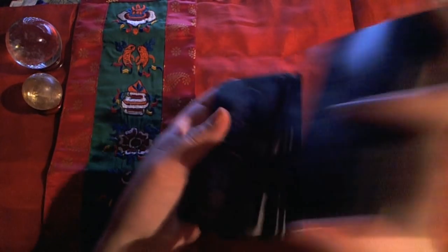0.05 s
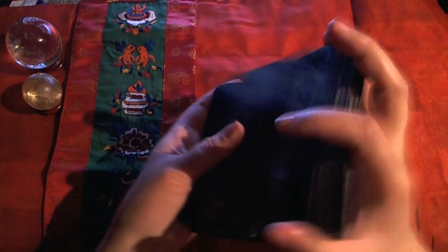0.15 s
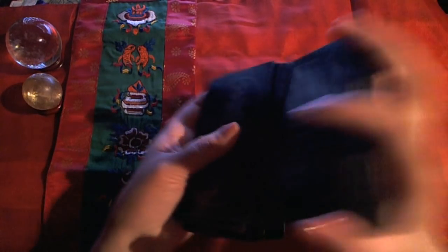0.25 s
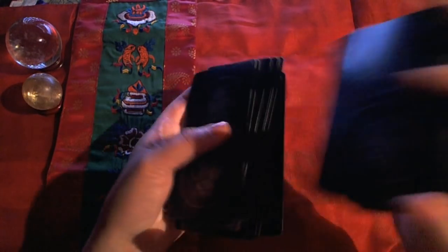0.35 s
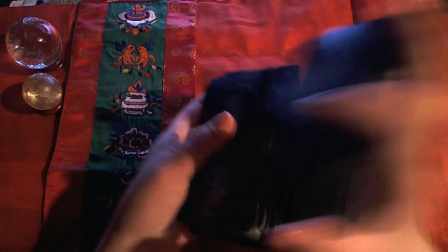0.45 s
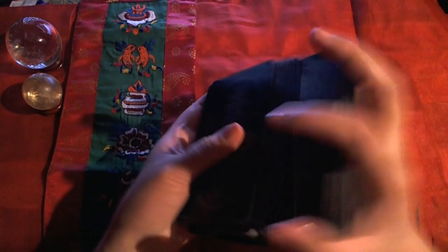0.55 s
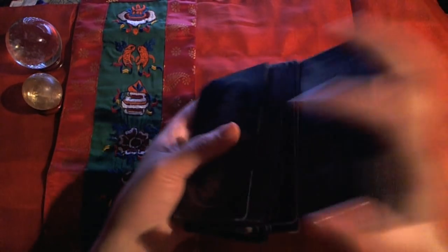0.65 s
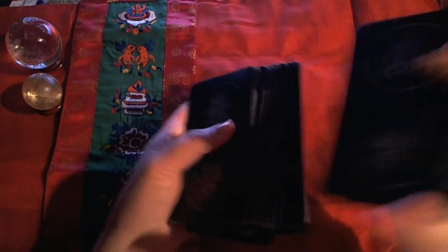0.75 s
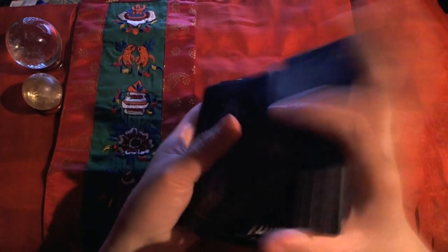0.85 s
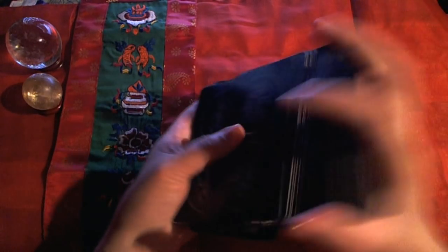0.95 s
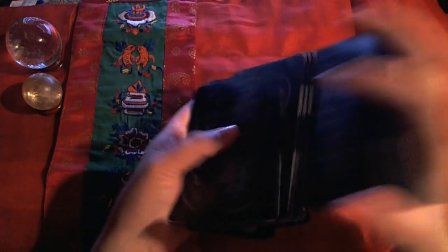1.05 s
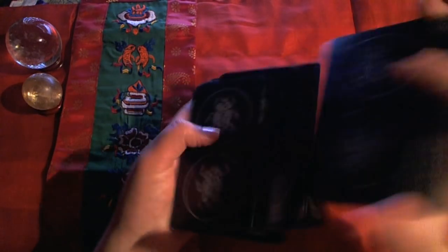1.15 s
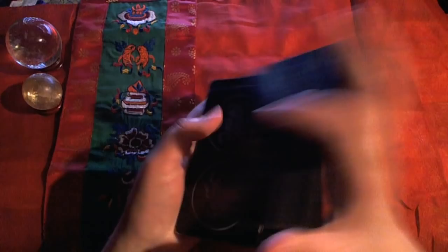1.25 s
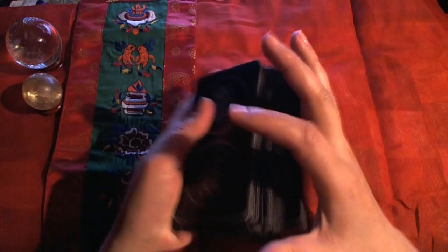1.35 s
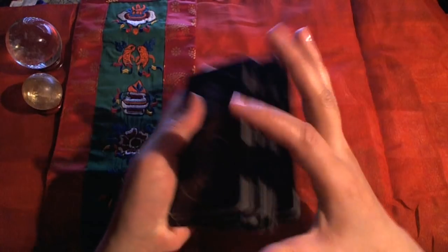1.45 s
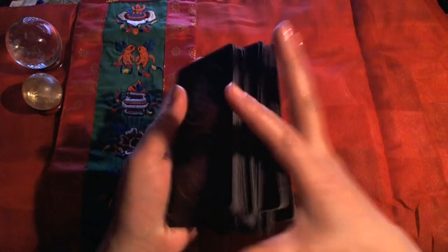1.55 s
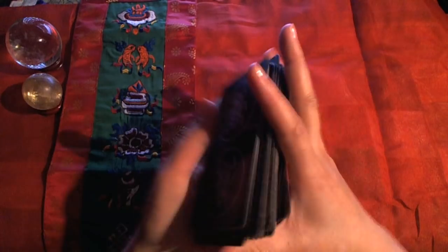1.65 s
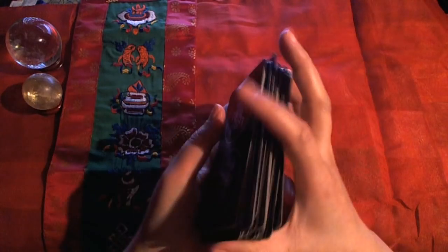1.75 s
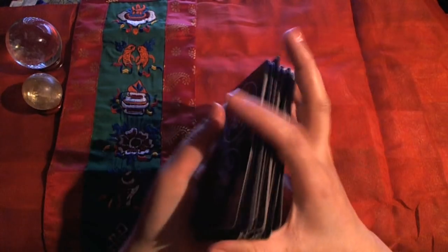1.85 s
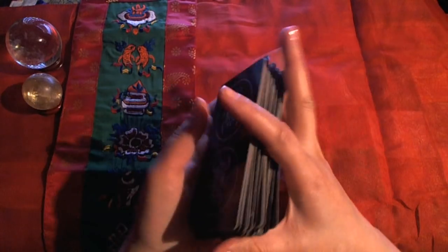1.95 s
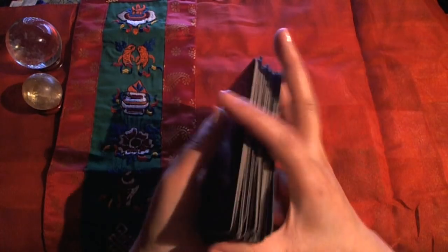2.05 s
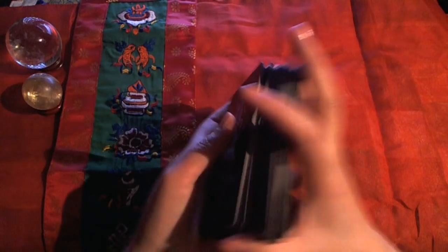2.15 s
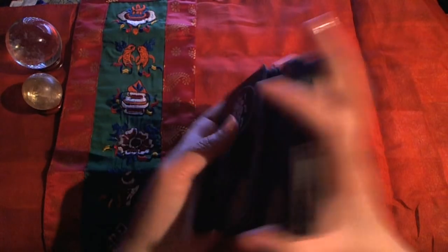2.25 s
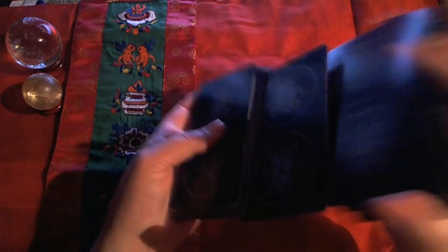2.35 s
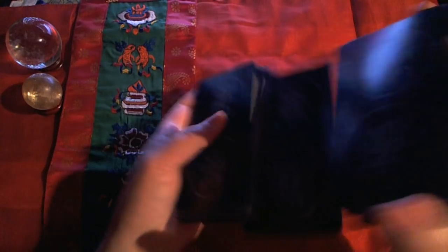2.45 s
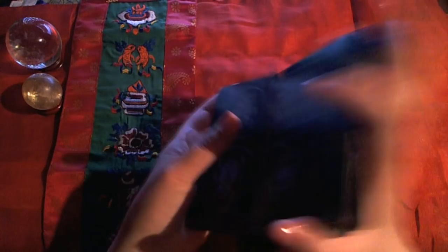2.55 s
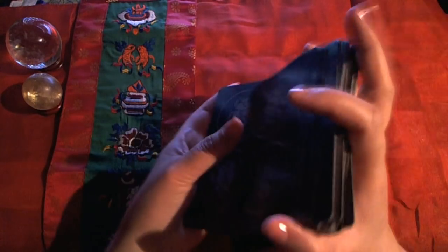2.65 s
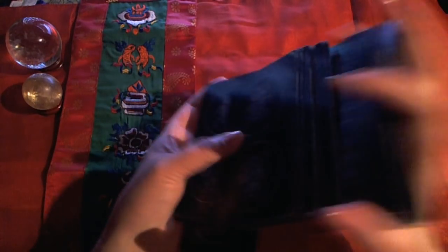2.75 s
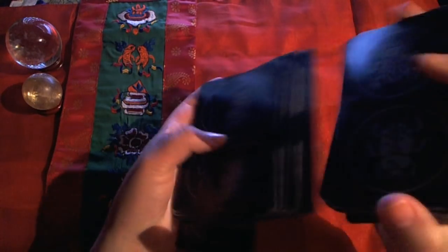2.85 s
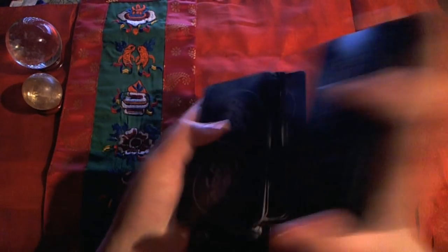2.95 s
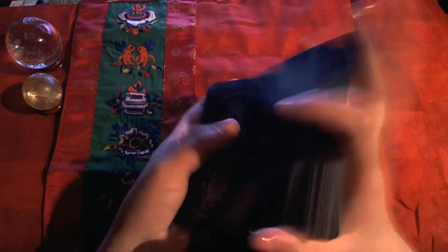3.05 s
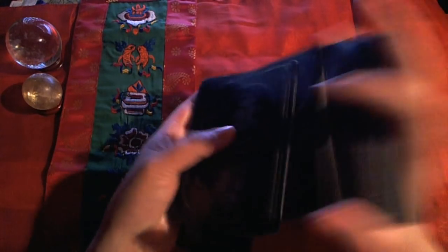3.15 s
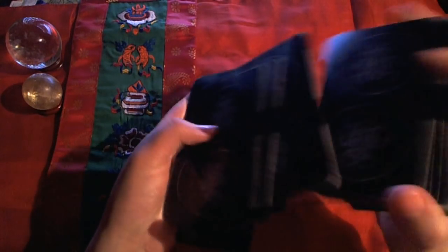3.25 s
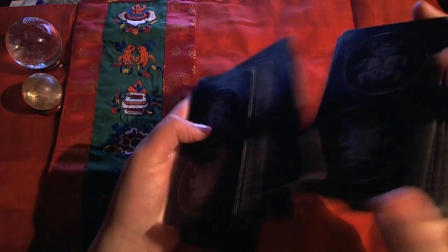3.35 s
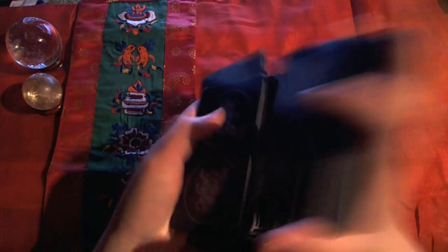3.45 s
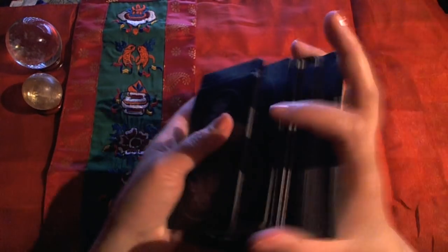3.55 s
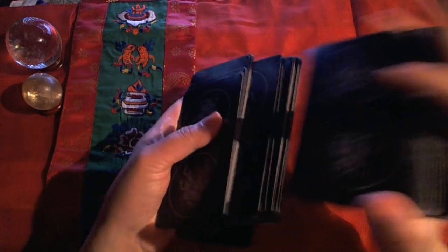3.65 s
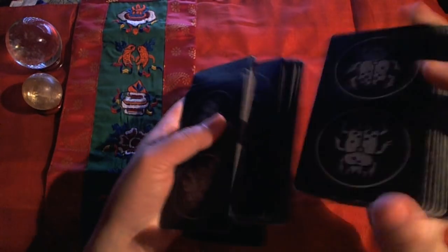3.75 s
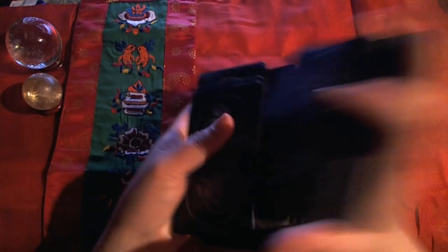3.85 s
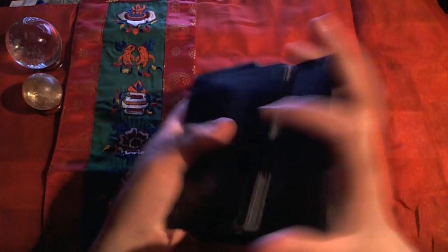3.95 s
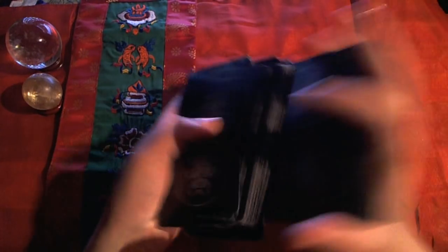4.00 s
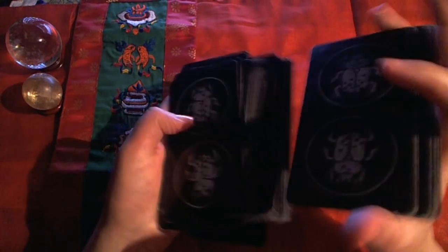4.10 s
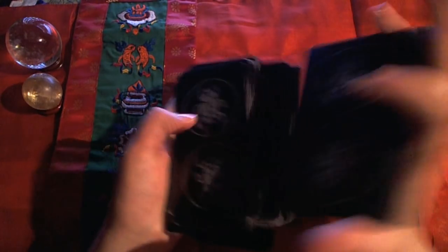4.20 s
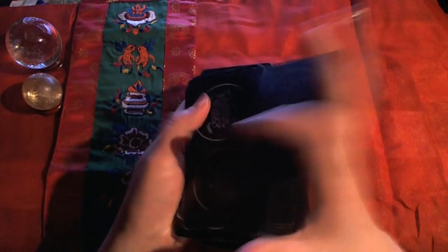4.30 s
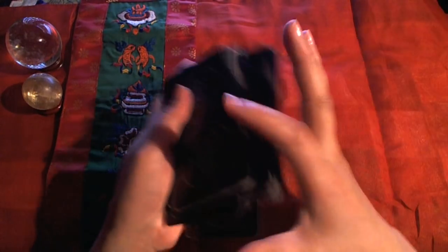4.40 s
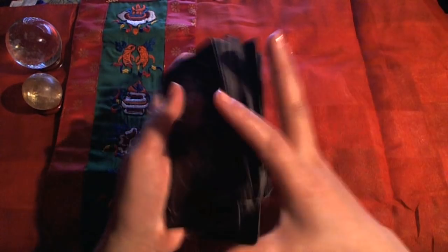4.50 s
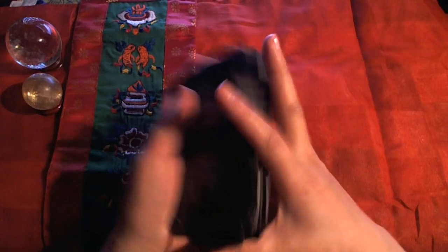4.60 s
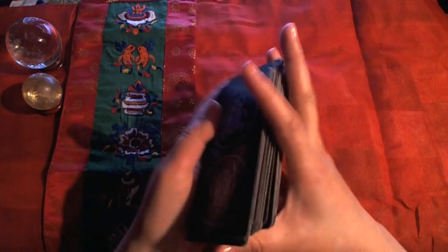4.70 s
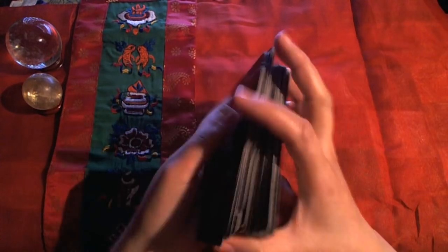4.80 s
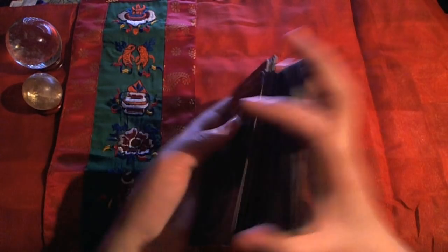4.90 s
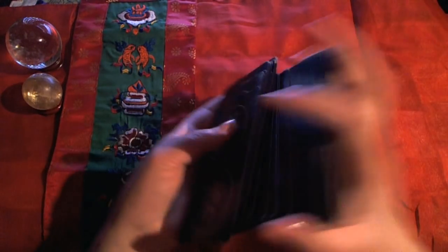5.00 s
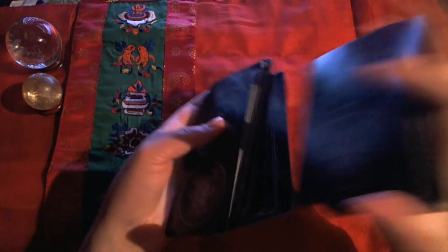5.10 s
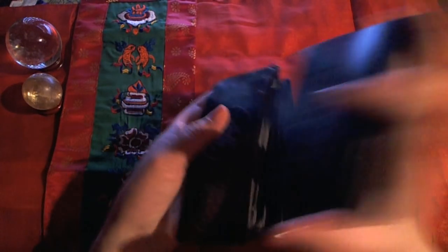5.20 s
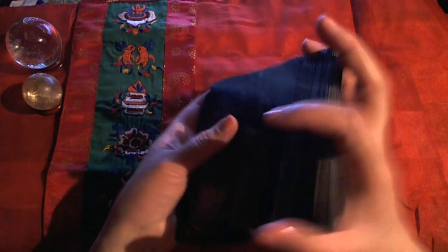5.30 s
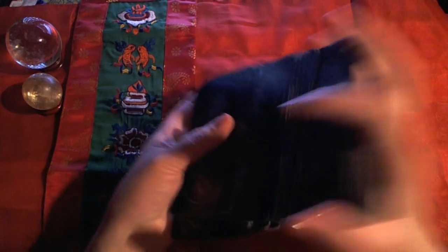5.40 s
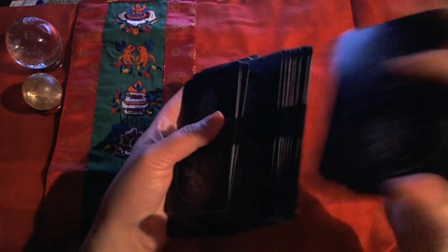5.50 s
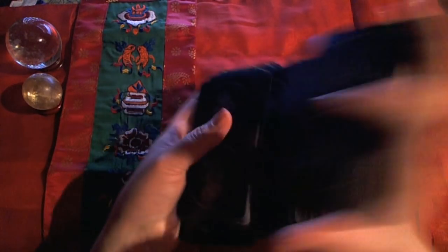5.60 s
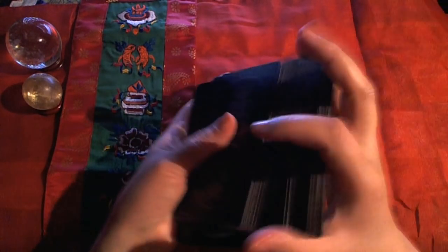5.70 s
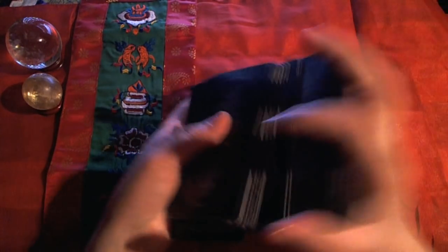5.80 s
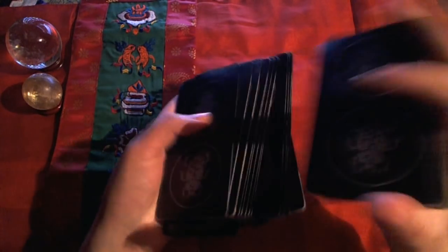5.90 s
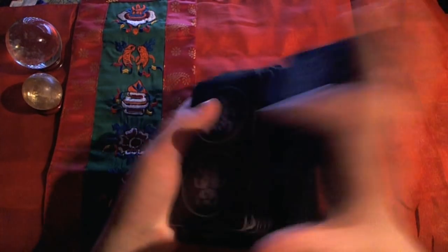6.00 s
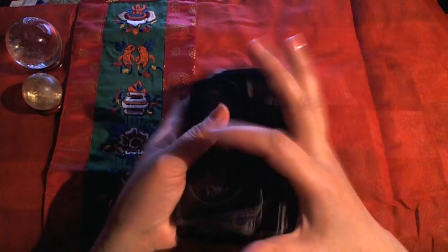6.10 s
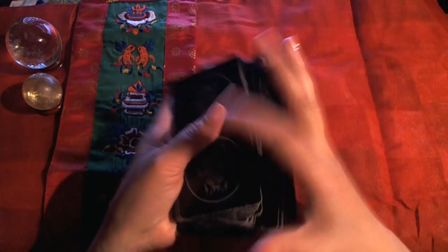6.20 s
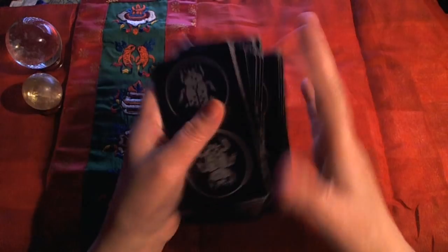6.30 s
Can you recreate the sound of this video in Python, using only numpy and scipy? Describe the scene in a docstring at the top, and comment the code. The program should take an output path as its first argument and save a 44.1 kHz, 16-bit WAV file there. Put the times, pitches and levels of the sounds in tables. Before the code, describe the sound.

A deck of large cards is shuffled overhand very close up, packets slapping and sliding together, with two short pauses to square it.

```python
"""Overhand shuffle of large cards

A deck of large cards is shuffled close to two microphone ports in a small, quiet room with a faint hum.
Packets touch, slap down with a thud and slide in: sprays of contacts and gritty friction noise drive the
card stock, and decaying sines give the thuds. Dragged packets scrape and catch, loose cards tap.
Twice the throws pause to square the deck, with rubbing faces and finger knocks; the room answers briefly."""
import sys
import numpy as np
from scipy import signal
from scipy.fft import rfft, irfft
from scipy.io import wavfile
from scipy.ndimage import map_coordinates

SR = 44100
rng = np.random.default_rng(int(sys.argv[2]) if len(sys.argv) > 2 else 0)


def to_wav(sig):
    """Store sig (one row per channel, or 1-D mono) as 16-bit WAV at the path in sys.argv[1].

    Samples outside -1..1 are clipped; the rate is SR.
    """
    pcm = np.clip(np.atleast_2d(sig), -1, 1) * 32767
    pcm = np.round(pcm).astype(np.int16)
    wavfile.write(sys.argv[1], SR, pcm.T)  # frames by channels


N = 280476

POCKET_PER_LOW_EDGE = 2.0  # in light contacts the air pocket rings an octave above the low edge
KNOCK_CYCLES = 1.7  # a finger knock swells for this many cycles


def amp(db):
    """Level law: decibels to amplitude gain."""
    return 10 ** (np.asarray(db) / 20)


def evened(x):
    """Power normalisation: scales to an rms of 1."""
    return x / np.sqrt(np.mean(x ** 2) + 1e-20)


def read(points, hz):
    """Spectral interpolation: reads a table on a log-frequency axis."""
    table_hz, value = np.transpose(points)
    return np.interp(np.log(hz + 1), np.log(table_hz + 1), value)


def add(mix, s, sound):
    """Superposition: mixes a sound in at time s."""
    part = mix[max(round(s * SR), 0):][:len(sound)]
    part += sound[:len(part)]


def wander(size, per_s):
    """Slow random modulation: smooth chance that changes about per_s times a second."""
    at = np.arange(size) * per_s / SR
    return np.interp(at, np.arange(size), rng.standard_normal(size))


def shaped(x, points):
    """Linear filtering: multiplies the spectrum by a table of frequency_hz, gain_db."""
    return irfft(rfft(x) * amp(read(points, np.fft.rfftfreq(N, 1 / SR))), N)


def background(spread=.2, waver=.3, waver_per_s=25, hum_db=-3.0, air_db=-65.5):
    """Stationary noise and tones: partly correlated room air, and hum partials with wavering phase."""
    # still air: frequency_hz, relative_density_db
    air_colour = [(18, -79), (30, -35), (145, -12), (189, -1.5), (319, -7), (486, -7), (760, -13.5),
                  (844, -13.5), (2010, -18.5), (4420, -28.5), (5040, -23.5), (8740, -37), (10200, -30),
                  (14800, -46), (16000, -68.5)]
    # hum partials: pitch_hz, rms_db (before the common hum_db)
    hum_partials = [(209.9, -70.5), (484.5, -69.5), (1104, -77.5)]
    mid, side = evened(shaped(rng.standard_normal((2, N)), air_colour))
    air = np.array([mid + spread * side, mid - spread * side])
    t = np.arange(N) / SR
    hum = np.zeros(N)
    for hz, db in hum_partials:
        cycles = hz * t + waver * wander(N, waver_per_s)
        hum += amp(db) * np.sqrt(2) * np.sin(2 * np.pi * cycles)
    return amp(air_db) * air + amp(hum_db) * hum


def skim(level_db=-52.5, hold_s=.05, end_s=.15, sag_per_s=.8):
    """Narrow-band air resonance: a swish sinks in pitch as the gap between two skimming cards opens."""
    # air between the parting cards: centre_hz, full_width_hz, relative_db
    air_bands = [(938.5, 250, -6.5), (1611, 160, 2), (2160, 400, 0.5), (4750, 700, -13.5),
                 (5715, 290, -18.5)]
    t = np.arange(SR // 4) / SR
    hz = np.fft.rfftfreq(len(t), 1 / SR)
    gain = sum(amp(db) / (1 + (2 * (hz - centre) / width) ** 2) for centre, width, db in air_bands)
    hiss = irfft(rfft(rng.standard_normal(len(t))) * gain, len(t))
    # reading ever more slowly lowers every band together
    positions = np.cumsum(np.exp(-sag_per_s * t))
    hiss = map_coordinates(hiss, [positions], order=3)
    fade = np.interp(t, [hold_s, end_s], [1, 0])
    return 0, amp(level_db) * fade * evened(hiss)


def room(x, first_s=0.00056, spread=0.11):
    """Reverberation: diffuse reflections decay band by band while a few resonances ring on."""
    # decay of the small room: frequency_hz, t60_s
    decay_times = [(200, 0.81), (530, 0.24), (1400, 0.12), (3700, 0.244), (9700, 0.18)]
    # strength of its answer: frequency_hz, relative_db
    answer_colour = [(100, -12), (300, 5), (700, 2), (1200, 0), (2250, -3), (3200, -9), (5000, -3),
                     (8000, -3), (15000, -3.5)]
    # narrow resonances that ring on in the answer: centre_hz, half_width_hz, relative_db, t60_s
    ringing_modes = [(1220, 130, -1, .17), (2240, 260, 0, .15), (4480, 400, -3, .15)]
    mid, side = rng.standard_normal((2, SR // 2))
    noise = np.array([mid + spread * side, mid - spread * side])  # the close ports hear nearly the same
    hz, t, z = signal.stft(noise, SR, nperseg=512)
    hz = hz[:, None]
    size = amp(read(answer_colour, hz) - 60 * t / read(decay_times, hz))
    for mode_hz, width, db, t60 in ringing_modes:
        mode = amp(db - 60 * t / t60) / (1 + ((hz - mode_hz) / width) ** 2)
        size = np.hypot(size, mode)
    tail = signal.istft(z * size, SR, nperseg=512)[1]
    tail *= 1 - np.exp(-(np.arange(tail.shape[1]) / SR / first_s) ** 2)  # the reflections build up
    return signal.fftconvolve(x[None], tail / np.linalg.norm(tail[0]), axes=1)[:, :N]


def thud(s, db, hz, swell):
    """Damped oscillation: soft flesh takes the blow with a low swing that swells and dies in a few cycles."""
    t = np.arange(SR // 8) / SR
    envelope = t / swell * np.exp(1 - t / swell)  # peaks at 1 after swell seconds
    return s, amp(db) * envelope * np.sin(2 * np.pi * hz * t)


def fidgets(count=120, per_s=11, level_db=-62.5, spread_db=1.5, lowest_hz=159, highest_hz=490):
    """Poisson process: shifting fingers give faint, soft knocks after exponentially distributed waits."""
    out, chance = np.zeros(N), rng.random((count, 3))
    times = np.cumsum(-np.log(1 - chance[:, 0])) / per_s
    for s, (_, pitch, size) in zip(times, chance):
        hz = lowest_hz * (highest_hz / lowest_hz) ** pitch
        db = level_db + spread_db * (2 * size - 1)
        add(out, *thud(s, db, hz, KNOCK_CYCLES / hz))
    return out


def card_ring(low_hz, high_hz, pocket_hz, pocket_gain, pocket_width=0.15, leak_db=-52, size=1024):
    """Minimum-phase impulse response: thick packets reach lower, hard edges higher, trapped air rings."""
    # what the card stock radiates: frequency_hz, relative_db
    card_colour = [(100, -11.5), (400, 1.5), (630, 0), (1150, 0.5), (2200, -0.5), (3200, -2), (4600, 0),
                   (6000, -2), (7500, -9), (10000, -11.5), (13000, -22.5), (16000, -26)]
    hz = np.fft.rfftfreq(size, 1 / SR) + 1
    band = 1 / np.sqrt((1 + (low_hz / hz) ** 8) * (1 + (hz / high_hz) ** 4))
    pocket = 1 + pocket_gain / (1 + (np.log(hz / pocket_hz) / pocket_width) ** 2)
    log_gain = np.log(amp(read(card_colour, hz)) * (band * pocket + amp(leak_db)))
    circle = np.concatenate([log_gain, log_gain[-2:0:-1]])
    spectrum = np.exp(np.conj(signal.hilbert(circle)))[:len(hz)]
    return irfft(spectrum, size)  # causal: rings only after the contact


def slide(fastest, rise, fall, db, low_hz, high_hz, pocket_hz, pocket_gain=4.5, closing=0.88,
          curve=1.6, grain_db=4, judder_db=4.0, judder_per_s=300, snag_size=16, snags_per_s=120):
    """Stick-slip friction: fibres slip with a juddering grip, edges snag, and hiss follows stroke speed."""
    grip = amp(judder_db * wander(SR, judder_per_s))
    grain = amp(grain_db * rng.standard_normal(SR))
    fibres = evened(rng.standard_normal(SR) * grain * grip)
    snags = snag_size * rng.uniform(-1, 1, SR) * (rng.random(SR) < snags_per_s / SR)
    catches = fibres + snags
    t = np.arange(-rise, fall, 1 / SR)
    speed = np.interp(t, [-rise, 0, fall], [0, 1, 0])
    hiss = signal.fftconvolve(catches[:2 * len(t)], card_ring(low_hz, high_hz, pocket_hz, pocket_gain))
    # the colour climbs as the gap between the cards closes
    hiss = map_coordinates(hiss, [np.cumsum(np.exp(closing * t))], order=3)
    return fastest - rise, amp(db) * speed ** curve * evened(hiss)


def rubs():
    """Sliding friction: card faces rub as the deck is gripped or squared."""
    # strokes: fastest_s, rise_s, fall_s, level_db (before the speed envelope), low_edge_hz, high_edge_hz
    strokes = [(.142, 0.022, 0.041, -58.5, 2460, 7500), (0.64, 0.032, 0.13, -43.5, 763, 14000),
               (1.01, .03, 0.097, -46.5, 1195, 8000), (1.615, 0.032, .11, -42, 2506, 11000),
               (1.759, 0.13, 0.027, -38, 3200, 8500), (1.845, .025, 0.026, -42.5, 2610, 9400),
               (1.925, 0.031, 0.042, -59.5, 2986, 8980), (2.113, 0.025, 0.07, -53.5, 4600, 8400),
               (2.207, 0.023, 0.052, -50, 4390, 15970), (2.329, 0.03, 0.09, -48.5, 2740, 13000),
               (2.653, .02, .015, -37, 1100, 4530), (2.949, 0.0094, .08, -50.5, 1950, 6850),
               (3.315, 0.017, .08, -60, 4500, 16100), (3.405, .02, .06, -60.5, 5180, 11000),
               (3.66, 0.019, 0.031, -54.5, 1200, 5000), (3.825, 0.032, 0.062, -63, 1400, 6970),
               (4.189, 0.067, 0.058, -57, 3096, 13000), (4.667, 0.1, .076, -33, 4600, 10600),
               (4.755, 0.053, 0.037, -42.5, 5290, 10070), (4.89, 0.044, 0.062, -58.5, 3700, 10300),
               (4.945, 0.021, 0.052, -47.5, 3200, 9470), (5.06, 0.054, 0.086, -60, 3200, 16000),
               (5.437, 0.061, 0.017, -40, 1020, 10500), (5.63, 0.0039, 0.035, -54.5, 4800, 12900),
               (5.751, 0.039, .015, -48.5, 1800, 8400), (5.864, 0.05, 0.052, -47.5, 1800, 8400),
               (6.217, 0.023, .05, -44, 2900, 8400)]
    out = np.zeros(N)
    for fastest, rise, fall, db, low_hz, high_hz in strokes:
        add(out, *slide(fastest, rise, fall, db, low_hz, high_hz, POCKET_PER_LOW_EDGE * low_hz,
                        pocket_gain=0.87, curve=1.5, grain_db=0.5, judder_db=2.83, snag_size=6))
    return out


def tap(s, db, length, low_hz, high_hz, pocket_hz, lead=1.3, scatter_db=2.5, pocket_gain=1.6,
        brush_db=-15, brush_share=1.0):
    """Multiple impact: edges brush, the leading card hits, its neighbours follow in a dying spray."""
    hit = SR // 100
    t = np.arange(-hit, 3 * hit) / SR
    contacts, sizes = rng.standard_normal((2, len(t)))
    away = abs(t) / max(length, 1e-4)
    brush = amp(brush_db) * np.exp(-away / brush_share) * (1 + t * SR / hit)
    force = np.where(t < 0, brush, np.exp(-away))
    spray = contacts * amp(scatter_db * sizes) * force
    spray /= np.linalg.norm(spray)
    # a square landing is nearly one click, a slanting one stays a soft spray
    spray[hit + SR // 5000] += lead / (1 + (length / .002) ** 2)
    ring = signal.fftconvolve(spray, card_ring(low_hz, high_hz, pocket_hz, pocket_gain))
    return s + t[0], amp(db) * ring / np.linalg.norm(ring) * np.sqrt(SR / 500)  # level over 2 ms


def landings(touch_s=.003, thud_hz=139, thud_swell_s=.0039, thud_ahead_s=.0041,
             slide_rise_s=.013, slide_thin=1.15, slide_top_hz=11000):
    """Impact then friction: each packet touches with one corner, slaps into the palm and slides home."""
    # packets: slap_s, touch_ahead_s, touch_db, slap_db, slap_length_s, low_edge_hz, high_edge_hz,
    # air_pocket_hz, thud_db, slide_db (before the speed envelope), slide_length_s
    packets = [(0.196, 0.0082, -21, -1, 0.0047, 1026, 16020, 2197, -37.5, -25, 0.11),
               (0.5693, 0.0017, -23.5, -15.5, 0.00064, 740, 9100, 3910, -64, -35, 0.092),
               (0.964, .019, -12.5, -7.5, 0.0027, 1197, 15000, 5460, -52, -42, 0.12),
               (1.4411, 0.0084, -24.5, -23.5, 0.0051, 450, 8970, 840, -48.5, -43, 0.035),
               (2.585, 0.0022, -14.5, -10.5, 0.0016, 504, 2360, 800, -33.5, -40, 0.23),
               (2.6602, 0.0066, -14.5, -6.5, 0.0018, 777, 3380, 2260, -48, -42, 0.12),
               (3.1047, 0.022, -17.5, -7, 0.0017, 860, 13330, 5020, -36.5, -33, 0.087),
               (3.526, 0.0022, -26.5, -10.5, 0.003, 705, 5500, 1515, -41, -34.5, 0.077),
               (3.937, 0.003, -27.5, -25.5, 0.0039, 720, 14000, 4430, -65, -49, 0.25),
               (4.3228, .002, -23, -22.5, 0.0022, 1176, 7870, 4540, -67, -42.5, 0.05),
               (4.42, 0.016, -39.5, -30, 0.0027, 438, 16000, 3020, -43, -49.5, 0.031),
               (5.3486, 0.0035, -18, -12.5, .0015, 760, 8400, 3480, -54, -31.5, 0.068),
               (5.758, 0.0043, -22.5, -17.5, .0042, 1213, 9500, 4000, -54, -37, 0.19),
               (6.1024, 0.0049, -19.5, -10.5, 0.0012, 1274, 9030, 3170, -49.5, -28, 0.049)]
    out = np.zeros(N)
    for (s, ahead, touch_db, slap_db, length, low_hz, high_hz, pocket_hz,
         thud_db, slide_db, slide_s) in packets:
        colour = low_hz, high_hz, pocket_hz
        add(out, *tap(s - ahead, touch_db, touch_s, *colour, pocket_gain=2.0, brush_db=-16))
        add(out, *tap(s, slap_db, length, *colour, pocket_gain=1.9, lead=0.66))
        add(out, *thud(s - thud_ahead_s, thud_db, thud_hz, thud_swell_s))  # palm takes the weight
        # a slide is thinner than its slap, and its high edge is capped
        thin_hz, dull_hz = slide_thin * low_hz, min(high_hz, slide_top_hz)
        add(out, *slide(s + slide_rise_s, slide_rise_s, slide_s, slide_db,
                        thin_hz, dull_hz, POCKET_PER_LOW_EDGE * thin_hz,
                        pocket_gain=.8, closing=2.0, curve=1.7, judder_db=2.0, snag_size=16))
    return out


def loose_cards():
    """Light impact: single cards fall against the deck."""
    # falling cards: hit_s, level_db, length_s, low_edge_hz, high_edge_hz
    falls = [(0.288, -23, 0.0013, 770, 5500), (0.5775, -19, 0.0035, 900, 12780),
             (0.5875, -19.5, 0.002, 1400, 16000), (.594, -21, 0.0067, 700, 16040),
             (0.635, -31.5, .0016, 740, 16000), (0.7008, -28, 0.0026, 650, 12900),
             (0.96, -16, 0.0028, 2000, 15900), (1.358, -28, 0.0019, 1400, 8900),
             (1.843, -33.5, 0.0016, 2700, 8460), (2.3902, -34, 0.0035, 370, 4470),
             (2.4358, -38.5, 0.0023, 450, 5440), (2.494, -45.5, 0.011, 420, 2260),
             (2.672, -13, .001, 1500, 6800), (2.94, -32.5, 0.0027, 2300, 6500),
             (3.0248, -34.5, 0.0011, 650, 12900), (3.097, -18, 0.00095, 1500, 8400),
             (3.2537, -35.5, 0.0018, 600, 8400), (3.0957, -17, 0.0016, 800, 7500),
             (3.125, -24, 0.0012, 1700, 15850), (3.267, -29, .0047, 1400, 16000),
             (3.5715, -33.5, .0018, 770, 4370), (5.355, -19, 0.002, 750, 10400),
             (5.401, -24.5, .0027, 1100, 8400), (5.898, -36.5, 0.0012, 930, 11100),
             (6.1064, -19, 0.0013, 1600, 10400), (6.162, -30.5, .0044, 1700, 9030)]
    out = np.zeros(N)
    for s, db, length, low_hz, high_hz in falls:
        add(out, *tap(s, db, length, low_hz, high_hz, POCKET_PER_LOW_EDGE * low_hz, pocket_gain=1.1))
    return out


def scrapes(catch_s=.0038, run_out_s=.042):
    """Friction with impact: a dragged packet gathers speed, its edge catches, and it runs out."""
    # drags over the deck: catch_s, catch_db, rub_db (before the speed envelope), run_up_s,
    # low_edge_hz, high_edge_hz
    drags = [(.298, -19.5, -31.5, 0.024, 535, 12200), (.684, -27.5, -32, 0.035, 1080, 8900),
             (1.107, -33.5, -49.5, .025, 2200, 8640), (1.272, -47.5, -50, 0.023, 3240, 5500),
             (1.407, -32, -37.5, 0.09, 1770, 10300), (2.403, -33.5, -51, 0.031, 450, 12000),
             (2.7973, -22, -38.5, 0.017, 1510, 3950), (3.005, -29.5, -45.5, 0.031, 2150, 12000),
             (3.233, -24.5, -42, 0.047, 1450, 4360), (3.491, -38.5, -47, 0.011, 1680, 3800),
             (3.993, -31, -40.5, 0.032, 1430, 9000), (4.079, -28.5, -37.5, .055, 1200, 7000),
             (4.114, -32, -50, 0.031, 1390, 11000), (4.341, -26, -42.5, 0.016, 1640, 14000),
             (4.396, -32, -34, 0.053, 2680, 14200), (5.532, -41, -58.5, 0.013, 870, 10940),
             (6.177, -26.5, -37.5, 0.033, 2800, 15000)]
    out = np.zeros(N)
    for s, catch_db, rub_db, run_up, low_hz, high_hz in drags:
        colour = low_hz, high_hz, POCKET_PER_LOW_EDGE * low_hz
        add(out, *tap(s, catch_db, catch_s, *colour, pocket_gain=0.69, brush_db=-11))
        add(out, *slide(s, run_up, run_out_s, rub_db, *colour, pocket_gain=0.4))
    return out


def knocks():
    """Damped impact: fingers knock softly on the deck."""
    # finger knocks: start_s, envelope_peak_db, pitch_hz
    finger_blows = [(1.378, -48.5, 224), (1.811, -54, 217.4), (2.392, -35, 609), (2.432, -48.5, 159),
                    (2.503, -47, 221), (2.787, -47.5, 215), (2.943, -52, 202), (3.807, -51, 486),
                    (4.134, -45.5, 226), (4.202, -46.5, 210), (4.421, -43, 640), (5.036, -51.5, 241),
                    (5.098, -46.5, 489), (5.231, -47, 230), (5.603, -56, 236), (5.856, -52, 226),
                    (5.898, -48.5, 632)]
    out = np.zeros(N)
    for s, db, hz in finger_blows:
        add(out, *thud(s, db, hz, KNOCK_CYCLES / hz))
    return out


def deck_ring():
    """Modal vibration: a square blow makes the stack ring like wood; loose cards blur each mode."""
    # knocks on the whole deck: start_s, level_db
    blows = [(2.586, -45.5), (2.661, -28.5), (3.527, -38)]
    # woody modes of the stacked deck: pitch_hz, relative_db, t60_s
    modes = [(820, -7, .14), (1130, -1, .17), (1230, 0, .18), (1400, -4, .17), (2130, -4, .15),
             (2290, -3, .17), (2950, -7, .15)]
    out, t = np.zeros(N), np.arange(SR // 3) / SR
    for s, level_db in blows:
        for hz, db, t60 in modes:
            blur = .35 * wander(len(t), 120)  # in cycles
            decay = amp(level_db + db - 60 * t / t60)
            add(out, s, decay * np.sin(2 * np.pi * (hz * t + blur)))
    return out


def scene(room_db=-16.5):
    """Direct and reverberant field: the cards just in front of the microphones, the room around them."""
    cards = fidgets() + rubs() + landings() + loose_cards() + scrapes() + knocks() + deck_ring()
    add(cards, *skim())
    return cards + amp(room_db) * room(cards) + background()


def record(dry, low_cut_hz=62, edge_hz=16300, ceiling=.85):
    """Transducer response: port colour, soft saturation of the hardest slaps, low cut and band limit."""
    # the two microphone ports: frequency_hz, left_minus_right_db
    port_balance = [(60, 0.5), (80, -2), (110, 2), (140, 1.5), (190, -2), (260, 2.5), (340, -2.5),
                    (460, -2), (610, -3), (820, -3), (1100, -0.5), (1470, -1.5), (1960, -0.5), (2620, 0.5),
                    (3510, 4.5), (4690, 2), (6270, -3), (8390, 1.5), (11200, -2), (15000, -0.5)]
    lean_db = read(port_balance, np.fft.rfftfreq(N, 1 / SR)) / 2
    ports = irfft(rfft(dry) * amp([lean_db, -lean_db]), N)
    clipped = ports / (1 + (ports / ceiling) ** 10) ** (1 / 10)
    low_cut = signal.butter(4, low_cut_hz, "high", fs=SR, output="sos")
    cut = signal.sosfilt(low_cut, clipped)
    band_limit = signal.firwin(511, edge_hz, window=("kaiser", 9), fs=SR)
    return signal.oaconvolve(cut, band_limit[None], "same")


dry = scene()
out = record(dry)
to_wav(out)
```